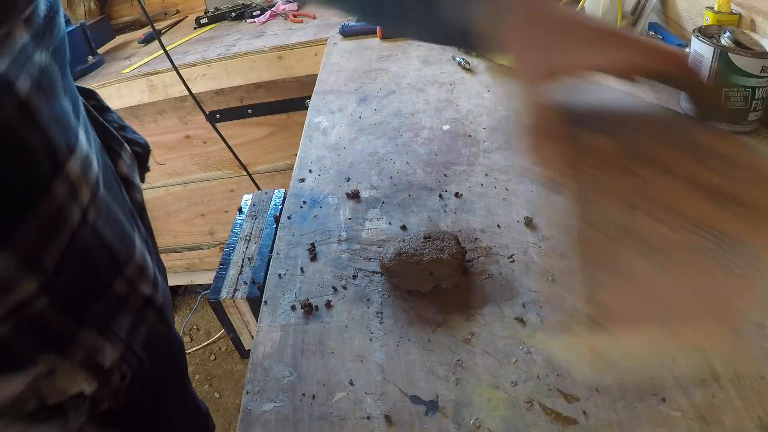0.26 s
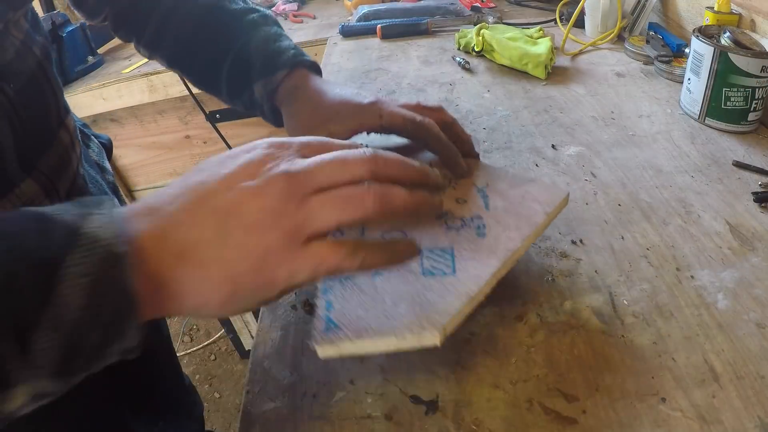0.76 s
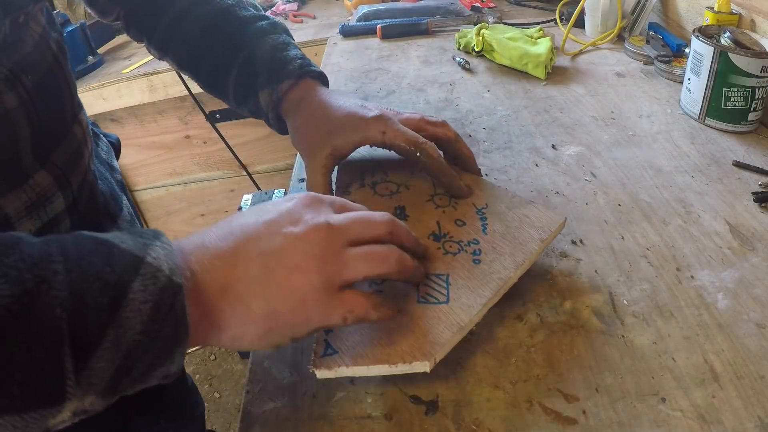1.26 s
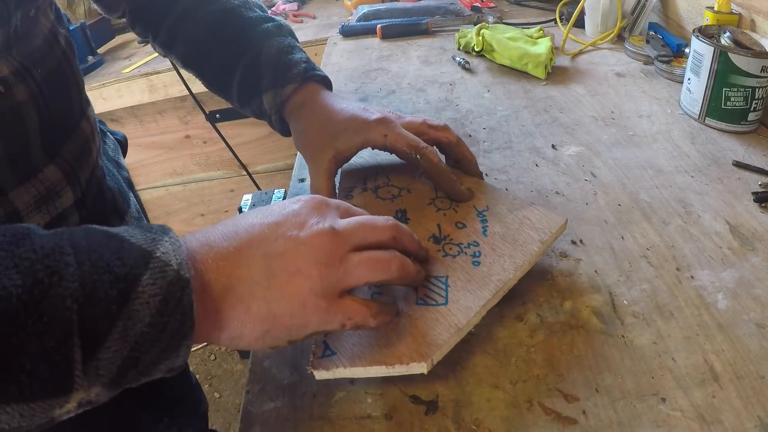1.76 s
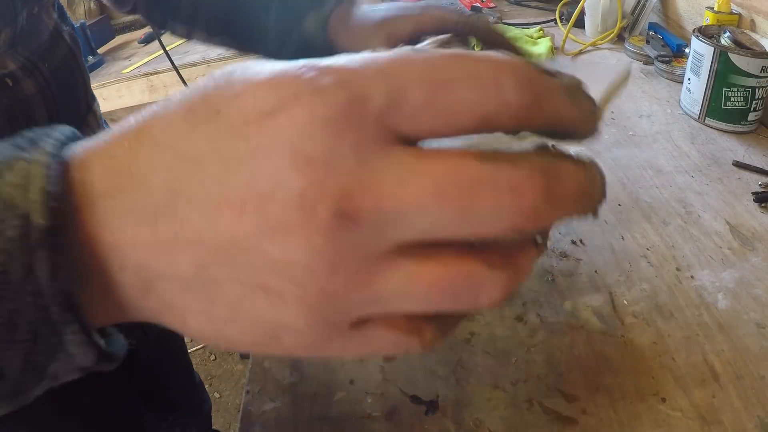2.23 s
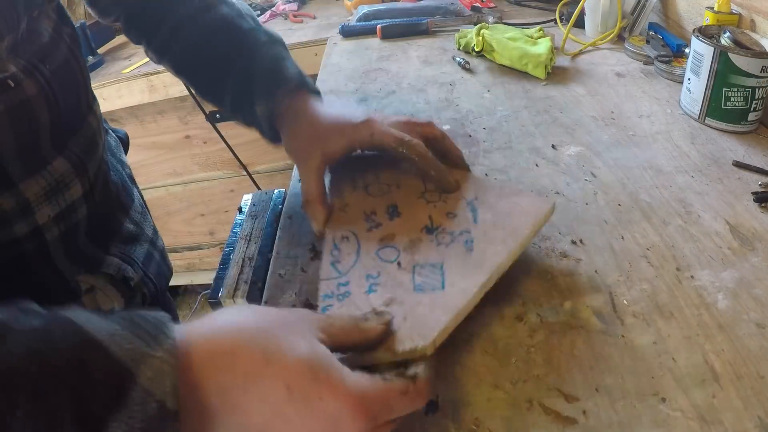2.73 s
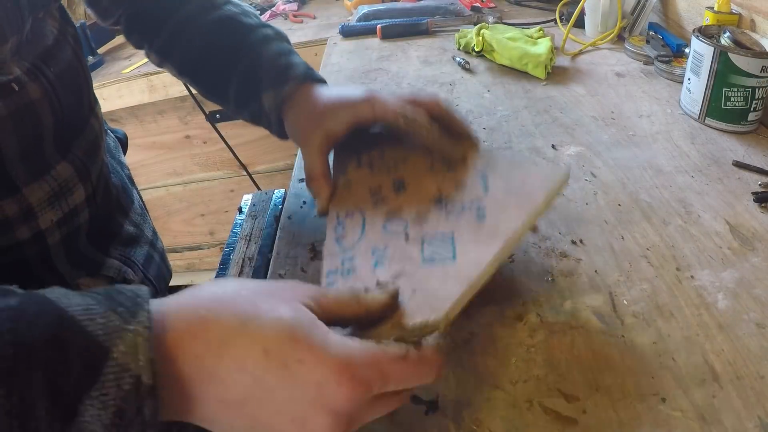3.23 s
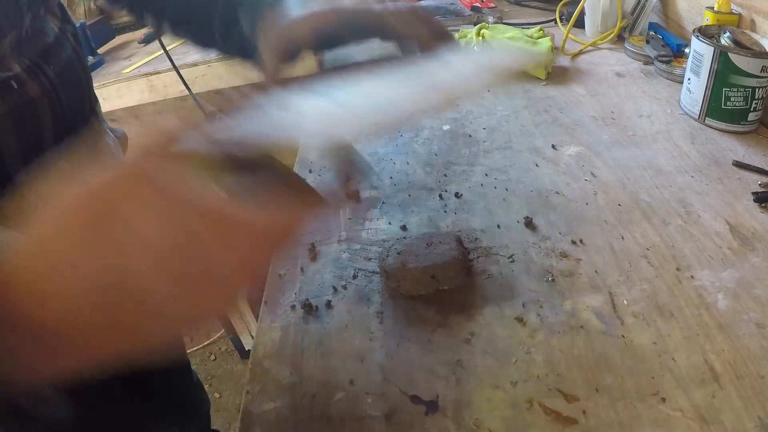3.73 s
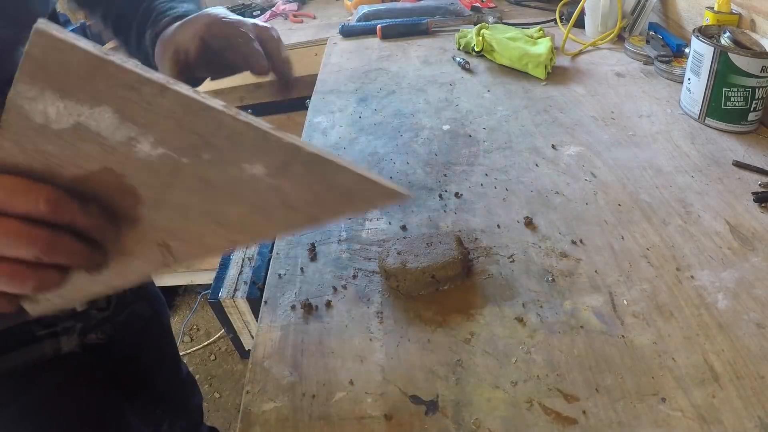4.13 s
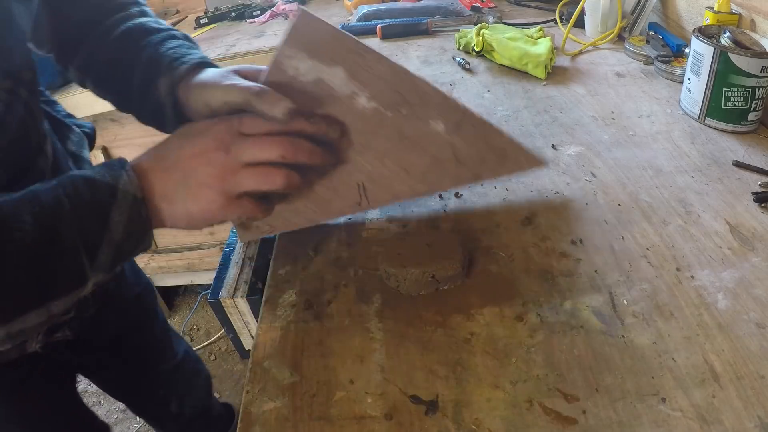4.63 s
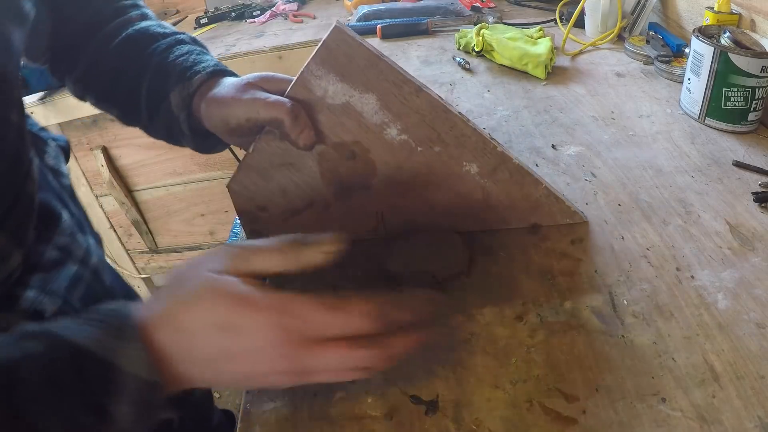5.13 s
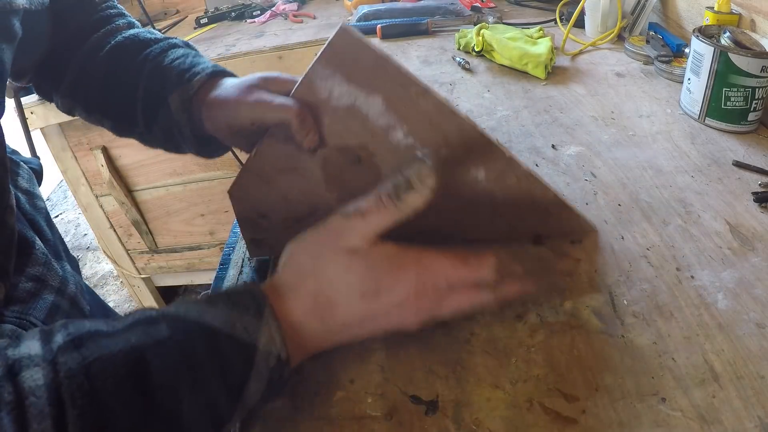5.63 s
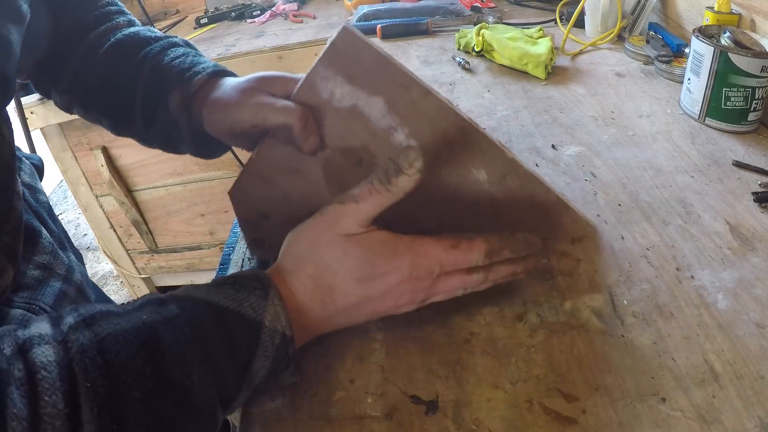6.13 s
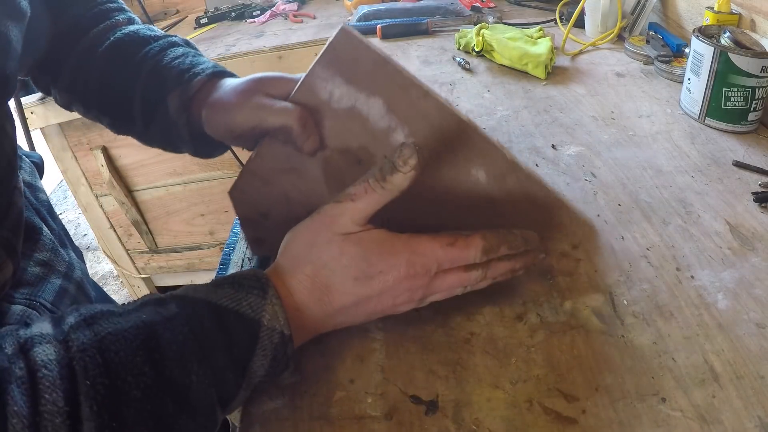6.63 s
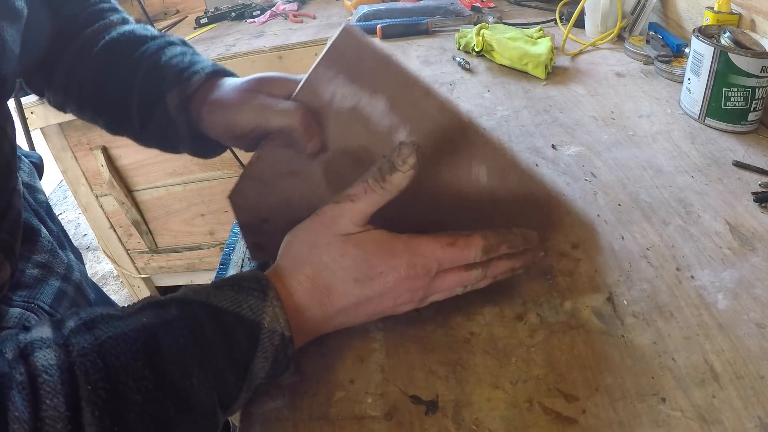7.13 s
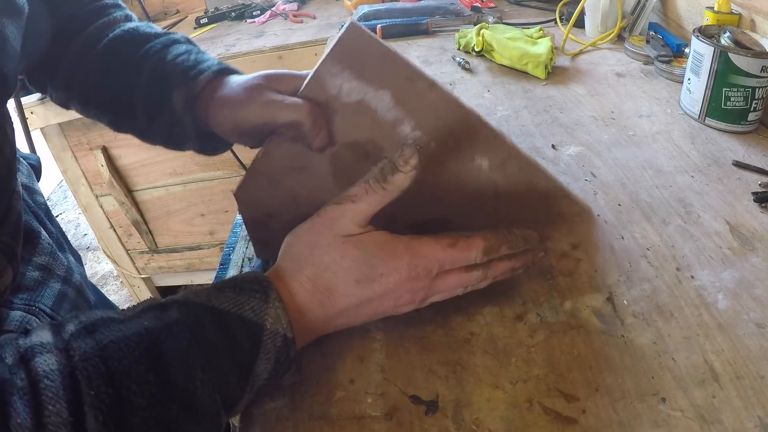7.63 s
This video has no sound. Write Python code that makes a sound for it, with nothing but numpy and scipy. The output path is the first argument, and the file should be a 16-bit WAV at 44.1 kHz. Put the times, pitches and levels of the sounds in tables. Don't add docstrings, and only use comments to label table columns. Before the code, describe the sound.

Close on a workbench in a quiet shed with faint hum and hiss. A palm pats a flat board onto wet soil in two deep thumps, a distant bird chirps, then five heavier slaps boom through the bench. After a lull of light brushing, the lump is slid repeatedly against the upright board with gritty scrapes and wooden knocks. The microphone stands on the bench and shakes.

```python
import sys
import numpy as np
from scipy import signal
from scipy.fft import rfft, irfft, next_fast_len
from scipy.io import wavfile
from scipy.ndimage import uniform_filter1d, minimum_filter1d, map_coordinates

SR = 44100
rng = np.random.default_rng(int(sys.argv[2]) if len(sys.argv) > 2 else 0)


def put_to_file(sound):
    columns = np.atleast_2d(sound).T
    safe = np.clip(columns, -1, 1)
    whole_steps = np.round(safe * 32767)
    wavfile.write(sys.argv[1], SR, whole_steps.astype(np.int16))


def volts_from_db(level):
    exponent = np.asarray(level, float) / 20
    return 10 ** exponent


N = 347508
T = np.arange(N) / SR

# time in seconds, level in dB.
AIR_GAIN = [
    (0, -62),
    (2.76, -62),
    (3.1, -68.5),
    (3.4, -71),
    (3.6, -68.5),
    (4.4, -65.5),
    (5.1, -60),
    (7.88, -60.5),
]
# frequency in Hz, level in dB per Hz.
AIR_COLOUR = [(53, -46), (90, -10.5), (190, -5.5), (274, -6.5), (354, -17.5), (385, -3), (447, -17.5),
              (566, -16.5), (630, -18), (797, -17), (868, -19), (2640, -31.5), (6620, -33.5),
              (12800, -41.5), (14900, -56.5)]
# frequency in Hz, level in dB per Hz.
RUMBLE_COLOUR = [(14, -16), (26, -2), (40, -4), (55, 0), (75, -5), (105, -22), (200, -30), (400, -42),
                 (600, -60)]
# frequency in Hz, likeness from 0 to 1.
FAR_LIKENESS = [(100, 0.21), (260, 0.078), (1000, 0.75), (2000, 0.13), (4000, 0.16), (7000, .05)]
# frequency in Hz, likeness from 0 to 1.
NEAR_LIKENESS = [(100, 0.51), (1000, 0.28), (4000, 0.99), (7000, 0.17), (10000, 0.36)]
LET_GO_DB, BLOW_RUMBLE_DB, RUMBLE_T60_S = -35, -14, 1.9
STILL_DB = -48

# start in seconds, peak in dB,
# hardness as upper mode level in dB, time in seconds until the boom is choked.
TOUCHES = [(0.695, -46, -14, .2), (0.871, -15.5, -13, 0.19), (0.935, -23.5, -4.5, 0.22),
           (1.132, -15.5, -11, .19), (1.24, -33, -19.5, 0.47), (1.435, -38.5, -17, 0.21),
           (1.595, -32.5, -18, 0.19), (1.918, -32.5, -22, 0.25), (2.005, -21.5, -24, 0.16),
           (2.748, -22, -38, .2), (2.763, -12.5, -7, 0.21), (2.971, -12, -11.5, 0.21),
           (3.157, -13, -11.5, 0.16), (3.361, -13.5, -9.5, 0.18), (3.551, -21, -6.5, .1),
           (3.57, -16.5, -5.5, 0.099), (3.66, -38, 3, .2), (4.187, -51.5, -3, .2), (4.619, -38, -37, .2),
           (4.716, -35.5, -33, 0.16), (4.8, -41, -6, .2), (4.913, -36, -6, 0.18), (5.005, -29, -8, 0.16),
           (5.071, -37, -10, 0.19), (5.241, -35, -3.5, .2), (5.295, -18.5, -0.5, .17),
           (5.39, -26.5, -6, 0.097), (5.655, -39, 4, .2), (5.7, -21, -4, .11)]
# start in seconds, peak in dB,
# hardness as upper mode level in dB, time in seconds until the boom is choked.
SHOVES = [(5.799, -19, -3, .1), (5.828, -18, -4, .18), (5.94, -15.5, -5, 0.17), (5.988, -12.5, -16.5, 0.15),
          (6.052, -14, -5, .2), (6.0792, -9, -20, .17), (6.165, -24.5, -21, 0.13), (6.23, -19.5, -13, .13),
          (6.332, -14, -12, .18), (6.446, -15, -14.5, 0.2), (6.494, -15.5, -20, 0.11),
          (6.575, -15.5, -11, .19), (6.715, -15, -14, .17), (6.775, -21, -10, .1), (6.806, -13.5, -8, .17),
          (6.92, -22, -12.5, 0.23), (6.978, -12, -10.5, 0.24), (7.065, -26, -6, 0.14),
          (7.12, -20, -7.5, .13), (7.198, -13.5, -10, .25), (7.2388, -13, -15, 0.13),
          (7.305, -16, -15, 0.21), (7.379, -13.5, -6, .13), (7.425, -17, -12, 0.14),
          (7.485, -20, -30, 0.11), (7.523, -11.5, -10, 0.25), (7.5842, -15, -12, .2),
          (7.65, -11.5, -9, 0.11), (7.725, -14.5, -6, .2), (7.7726, -12, -14, .17)]
# frequency in Hz, level in dB, share of the boom's decay time.
BOOM_MODES = [(143, -9, 1.3), (147.5, 0, 1.0)]
# frequency in Hz, level in dB, decay time (T60) in seconds.
UPPER_MODES = [(203.3, -4, 0.18), (246.7, -1.5, 0.19), (275, -4.5, 0.2), (354.3, -10, 0.16),
               (434, -15, 0.11), (492, -14.5, 0.068), (670, -20, 0.06)]
# frequency in Hz, level in dB, decay time (T60) in seconds.
SWAY_MODES = [(29.1, -12, 0.9), (53.3, 4.5, 0.19), (81.4, -6, 0.59)]
HARD_T60_S, T60_HALVES_DB = 0.95, 39
SWAY_DB, SWAY_GROWS = -25, 0.31

# start in seconds, peak in dB, treble in dB, soil pad in dB, note in Hz.
PATS = [
    (0.877, -3, -26, -49, 1020),
    (1.13, -19, -6, -42, 1040),
    (2.77, 0.5, -20, -12.5, 1360),
    (2.98, -11, -15.5, -4, 1050),
    (3.163, -7, -18.5, -7.5, 1260),
    (3.364, -25, -13, 4, 1070),
    (3.558, -13, -4, -5, 1950),
]
# start in seconds, peak in dB, treble in dB, note in Hz.
TICKS = [
    (0.908, -29, -8.5, 1110),
    (1.592, -35.5, -9, 1530),
    (1.657, -37, -21, 3050),
    (2.108, -28.5, -35, 1000),
    (2.439, -33, -24, 900),
    (4.389, -38, -0.5, 4000),
    (5.247, -30, -9, 1840),
]
# start in seconds, peak in dB, treble in dB, note in Hz.
KNOCKS = [(5.276, -16, -7.5, 1060), (5.804, -12.5, -13, 1760), (5.826, -22.5, -5, 1140),
          (5.999, -26, -18, 3340), (6.334, -15.5, -9, 1150), (6.577, -10, -5, 3630), (6.721, -33, -9, 3460),
          (6.808, -8.5, -13, 1310), (7.198, -8.5, -18, 1306), (7.656, -30, -28, 3280),
          (7.727, -11.5, -8.5, 1790), (7.832, -36.5, -25, 3270)]
# frequency in Hz, width in Hz, level in dB.
BOARD_PEAKS = [(1067, 89, 10), (1640, 390, -1.5), (2280, 260, 0), (3460, 280, -6.5)]
# frequency in Hz, width in Hz, level in dB.
SKIN_PEAKS = [(4260, 540, 4), (6470, 480, 0.5), (9000, 850, -10)]
# frequency in Hz, level in dB per Hz.
SOIL_COLOUR = [(250, -2.5), (420, 3.5), (700, -4), (1000, -9), (1600, -18.5)]
# frequency in Hz, decay time (T60) in seconds.
SHED_DECAY = [(300, 0.1), (1000, 0.27), (4000, 0.11), (10000, 0.23)]
PAT_TAIL_DB, PAT_TAIL_GROWS = -21.5, 0.24
TICK_PAD_DB, TICK_TAIL_DB = -20.5, -14.5
KNOCK_PAD_DB, KNOCK_TAIL_DB = -11.5, -22.5
OVERTONE, OVERTONE_DB = 1.7, -8.5
SOFT_HZ = 6000

# start in seconds, frequency in Hz,
# level in dB, decay time (T60) in seconds.
FREE_RINGS = [(.878, 1040, -17, .09), (2.981, 1020, -17, .09), (6.992, 350, -15, .15),
              (7.535, 345, -15, .13), (7.655, 357, -14, .12), (5.715, 350, -21, .13), (1.18, 70, -22, .5),
              (2.99, 62, -20, .5), (.935, 277, -17, 0.18), (.94, 364, -24, .2), (1.145, 274, -22, 0.28),
              (1.15, 360, -22, .25), (2.772, 670, -17, .1), (2.984, 670, -16, .12), (2.775, 357, -14, .12),
              (2.985, 360, -14, .12), (3.172, 503, -20, .1), (3.572, 490, -6, .12), (3.57, 360, -13, .1),
              (5.345, 349, -14, .25), (5.35, 262, -19, .25), (5.3, 48, -17, .3), (5.82, 52, -15, .35),
              (4.62, 62, -27, .4), (3.6, 75, -26, 1.1)]
# start in seconds, peak in dB, note in Hz.
THUDS = [(0.881, -20, 207), (1.134, -25, 215), (2.776, -17, 205), (2.984, -13.5, 207), (3.175, -17.5, 240),
         (3.378, -16, 242), (3.57, -16, 218), (5.297, -16.5, 237), (5.712, -23, 242), (5.804, -13.5, 242),
         (5.824, -12, 252.4), (5.949, -22, 242), (5.997, -14, 207), (6.053, -13.5, 242), (6.073, -15, 260),
         (6.335, -18.5, 244), (6.447, -23, 242), (6.494, -28, 205), (6.577, -15, 235), (6.721, -19, 206),
         (6.808, -13.5, 242), (6.854, -28, 213), (6.983, -13, 207), (7.016, -23, 207), (7.068, -25, 263),
         (7.133, -26, 207), (7.198, -16.5, 241), (7.24, -21, 248), (7.307, -25, 256), (7.382, -19.5, 231),
         (7.425, -19, 210), (7.528, -18, 207), (7.584, -16, 205), (7.653, -15.5, 258), (7.728, -15, 245),
         (7.774, -14, 226)]
# multiple of the note, level in dB, decay time (T60) in seconds.
THUD_PARTIALS = [(1, 1.5, .065), (1.5, -6, 0.082), (1.8, -7, 0.055), (2.3, -9, .045), (3.0, -11, .04)]
THUD_DB, THUD_RISE_S = 14.5, .0025

# start in seconds, level in dB, decay time (T60) in seconds.
NODS = [
    (0.899, -15, 3),
    (1.16, -19, 0.6),
    (2.0, -39.5, 0.77),
    (2.801, -20.5, 2.8),
    (3.0, -16.5, 0.86),
    (4.34, -27, 0.32),
]

# peak time in seconds, level in dB, rise and fall in ms over 10 dB.
BRUSHES = [(.915, -44, 8, 14), (1.134, -39.5, 1.5, 8), (3.88, -65.5, 200, 117), (1.504, -56, 83, 4),
           (1.662, -52, 38, 52), (2.053, -47.5, 19, 41), (2.116, -52.5, 85, 7), (2.441, -60, 12, 7),
           (2.519, -49.5, 8, 13), (4.059, -52, 28, 30), (4.222, -54.5, 12, 81), (4.392, -57, 32, 27),
           (4.63, -61, 209, 200), (4.822, -57, 50, 63), (4.925, -50, 29, 200), (5.007, -45.5, 103, 49),
           (5.365, -48, 47, 33), (5.507, -54, 123, 10), (5.7, -49.5, 65, 51), (3.554, -45.5, 8.5, 63),
           (7.066, -46, 6, 69), (7.609, -47.5, 35, 76), (7.793, -44, 25, 58)]
# peak time in seconds, level in dB, rise in ms over 10 dB.
PUSHES = [(5.293, -39.5, 31), (5.714, -37.5, 9), (5.805, -33, 26), (6.064, -29, 23), (6.325, -34.5, 27),
          (6.576, -31.5, 24.5), (6.8, -30, 22), (7.003, -33.5, 21), (7.191, -32, 26), (7.373, -33, 28),
          (7.535, -36.5, 9.5), (7.723, -32.5, 40)]
# peak time in seconds, level in dB, rise in ms over 10 dB.
PULLS = [(5.952, -43, 22), (5.975, -42.5, 12), (5.999, -38.5, 3), (6.203, -44, 23), (6.243, -41, 27),
         (6.451, -41, 22), (6.502, -46.5, 45), (6.689, -39.5, 25), (6.72, -42, 9), (6.909, -42, 42),
         (6.929, -40.5, 27), (7.127, -37.5, 57), (7.309, -39, 45), (7.489, -41.5, 49), (7.657, -39, 6),
         (7.834, -43, 15.5), (7.869, -38, 6)]
# frequency in Hz, level in dB per Hz.
GRIT_COLOUR = [(880, -12), (1500, -16), (1750, -10.5), (2800, -6.5), (3330, -3.5), (3770, -5), (6780, -4.5),
               (8300, -19), (12800, -30.5), (13700, -52), (14900, -105)]
# frequency in Hz, width in Hz, level in dB.
GRIT_RINGS = [(3340, 230, -4.5), (6170, 800, -7.5)]
# frequency in Hz, level in dB per Hz.
DRAG_COLOUR = [(250, -43), (400, 3.5), (800, -2.5), (1400, -5.5), (2200, -8.5)]
# frequency in Hz, level in dB per Hz.
SHAKE_COLOUR = [(90, -16), (145, -1.5), (200, -2.5), (260, -9.5), (380, -13.5), (550, -35)]
PUSH_FALL_MS, PULL_FALL_MS = 20.6, 19
PUSH_STARTS, PUSH_EDGE_DB = 1.28, 50
CRUMBLE_S, CRUMBLE_DB, CRUMBLE_RISE_MS, CRUMBLE_FALL_MS = 0.037, -20, 24, 40
BRUSH_LOW_DB, PUSH_LOW_DB, PULL_LOW_DB, CRUMBLE_LOW_DB = -3, -6.5, -7.5, -2.5

# start and end in seconds, start and end pitch in Hz, level in dB.
BIRD = [
    (.95, 1.01, 3350, 3280, -63),
    (1.05, 1.09, 2350, 2200, -59),
    (1.17, 1.24, 4150, 4500, -59),
    (1.225, 1.3, 6120, 6070, -56),
    (1.326, 1.365, 5600, 2800, -52),
    (1.355, 1.42, 2800, 2580, -58),
    (1.45, 1.55, 2450, 2350, -60),
    (1.53, 1.57, 2900, 2950, -63),
]
# frequency in Hz, width in Hz, level in dB.
SLIDE_PEAKS = [(1040, 39, 10.5), (1840, 78, -9), (3050, 80, -4), (4600, 160, -14)]
SLIDE_S, SLIDE_END_S, SLIDE_DB = 2.04, 2.125, -37.5
# start in seconds, level in dB, time until damped in seconds.
TOOL = [
    (2.775, -66, 0.22),
    (2.985, -47.5, 0.18),
]
# start in seconds, peak in dB.
SNAPS = [(5.2744, -18), (5.2964, -25), (5.8032, -16.5), (5.8254, -27), (5.8554, -35), (5.8634, -31),
         (5.9269, -32), (5.9968, -21), (6.0437, -20), (6.3066, -24), (6.333, -19), (6.4434, -29),
         (6.549, -22), (6.5765, -13), (6.6747, -30), (6.7216, -29), (6.782, -20), (6.8069, -12),
         (6.9002, -28), (6.983, -23), (7.1611, -22), (7.1975, -11.5), (7.3053, -27), (7.3462, -28),
         (7.5303, -25), (7.653, -24), (7.7268, -12.5), (7.8311, -29), (7.8605, -30)]
# frequency in Hz, width in Hz, level in dB.
SNAP_PEAKS = [(900, 1100, 8), (3500, 1530, -1), (5800, 1200, -10)]
SNAP_DB, SNAP_T60_S = 7, .011
SNAP_GROWS = 1.55

# frequency in Hz, phase in radians.
PORT_PHASE = [(20, 0), (35, -.4), (60, -1.2), (145, -2.0), (260, -2.45), (600, -3.2), (1300, -4.0),
              (2000, -5.6), (2800, -6.0), (4000, -6.2), (7000, -5.8), (15000, -6.2)]
# frequency in Hz, left minus right in dB.
PORT_BALANCE = [(30, -1), (55, -3), (145, -3.5), (300, -2.5), (700, 1), (1500, 0), (5000, -1), (14000, -.5)]
# frequency in Hz, level in dB.
MONO_COLOUR = [(60, 2), (200, -1), (500, -3), (1200, -1.5), (3000, 1.5)]
# time in seconds, share from 0 to 1.
WIDTH = [
    (0, 1),
    (3.62, 1),
    (4.05, 0),
    (4.82, 0),
    (5.3, 1),
    (7.88, 1),
]
TOP_HZ = 15050


def unit(x):
    return x / np.sqrt(np.mean(x ** 2) + 1e-20)


def along(points, hz):
    f, v = np.transpose(points)
    return np.interp(np.log(hz + 1), np.log(f + 1), v)


def wobble(rate):
    return map_coordinates(rng.standard_normal(int(N * rate / SR) + 4), [T * rate])


def place(out, start_s, sound):
    i = round(start_s * SR)
    out[..., i:i + sound.shape[-1]] += sound


def filtered(x, response):
    m = next_fast_len(N + SR // 2)
    return irfft(rfft(x, m) * response(np.fft.rfftfreq(m, 1 / SR)), m)[..., :N]


def resonant(x, peaks):
    def response(f):
        return sum((-1) ** k * volts_from_db(db) * 1j * f * width / (hz * hz - f * f + 1j * f * width)
                   for k, (hz, width, db) in enumerate(peaks))
    return filtered(x, response)


def softened(x):
    return filtered(x, lambda hz: 1 / (1 + 1j * hz / SOFT_HZ) ** 2)


def rush(spectrum, alike, grain=1):
    def mid_side(hz):
        turn = np.arccos(np.clip(along(alike, hz), 0, 1)) / 2
        colour = volts_from_db(along([(5, -120)] + list(spectrum) + [(17000, -120)], hz))
        return colour * [np.cos(turn), np.sin(turn)]
    mid, side = filtered(grain * rng.standard_normal((2, N)), mid_side)
    return unit(np.array([mid + side, mid - side]))


def patchy(x, depth_db):
    z = signal.stft(x, nperseg=512)[2]
    field = uniform_filter1d(rng.standard_normal(z.shape[1:]), size=4, axis=0)
    field = uniform_filter1d(field, size=7, axis=1)
    return unit(signal.istft(z * volts_from_db(depth_db * unit(field)), nperseg=512)[1][:, :N])


def ring(t, hz, db, t60, turns=0):
    return volts_from_db(db - 60 * t / t60) * np.sin(2 * np.pi * (hz * t + turns))


def shaken_db():
    power = volts_from_db(2 * STILL_DB) + volts_from_db(2 * (LET_GO_DB - 60 * T / RUMBLE_T60_S))
    for s, db, *_ in TOUCHES + SHOVES:
        i = round(s * SR)
        t = T[:N - i]
        power[i:] += volts_from_db(2 * (db + BLOW_RUMBLE_DB - 60 * t / RUMBLE_T60_S)) * np.minimum(t / .06, 1)
    return 10 * np.log10(power)


def background():
    hiss_db = np.interp(T, *np.transpose(AIR_GAIN)) + 17.5 + 0.29 * wobble(3.36)
    hiss = volts_from_db(hiss_db) * patchy(rush(AIR_COLOUR, FAR_LIKENESS), depth_db=1.5)
    rumble = volts_from_db(shaken_db() + 2.5 * wobble(9)) * rush(RUMBLE_COLOUR, [(30, .85), (60, .5), (300, .8)])
    hum = volts_from_db(-43.5 + 0.56 * wobble(6.6)) * np.sin(2 * np.pi * 55 * T + 0.24 * wobble(3.6))
    whine = volts_from_db(-64 + 0.67 * wobble(14)) * np.sin(2 * np.pi * 387 * T + .5 * wobble(6.67))
    still = np.clip((2.77 - T) / .02, 0, 1)
    return hiss + rumble + still * (hum + whine)


def blows():
    rows = []
    for s, db, hard_db, held_s in TOUCHES + SHOVES:
        sway_db = SWAY_DB + (SWAY_GROWS - 1) * db
        t60 = HARD_T60_S * 2 ** (min(hard_db, 0) / T60_HALVES_DB)
        rows.append((s, db, hard_db, sway_db, t60, held_s))
    return rows


def bench():
    out, t = np.zeros((2, N + 2 * SR)), np.arange(SR) / SR
    swell = (1 - np.exp(-t / 0.0038)) ** 2
    bloom = (1 - np.exp(-t / 0.012)) ** 2
    quick = 1 - np.exp(-np.maximum(t - .005, 0) / 0.002)

    def turns(spread):
        return rng.random() + spread * rng.standard_normal((2, 1))

    rows = blows()
    next_starts = [row[0] for row in rows[1:]] + [9]
    for (s, db, upper_db, sway_db, t60, held_s), later in zip(rows, next_starts):
        damped = volts_from_db(-60 * np.maximum(t - (later - s), 0) / 0.035)
        pressed = np.maximum(volts_from_db(-60 * (t / held_s) ** 2.48), volts_from_db(-17.5))
        boom = sum(ring(t, hz, level, max(t60, .04) * share, [[0.067 * rng.normal()], [0]])
                   for hz, level, share in BOOM_MODES)
        upper = sum(ring(t, hz * rng.normal(1, 0.033), level + upper_db + rng.normal(0, 1.52), decay, turns(0.098))
                    for hz, level, decay in UPPER_MODES)
        sway = sum(ring(t, hz * rng.normal(1, 0.026), level + sway_db + 0.5, decay, turns(0.27))
                   for hz, level, decay in SWAY_MODES)
        blow = bloom * damped * pressed * boom + quick * damped * upper + swell * sway
        place(out, s, volts_from_db(db + 8.2) * blow)
    return out[:, :N]


def cracks():
    pats = [(s, db, treble_db, pad_db, PAT_TAIL_DB + (PAT_TAIL_GROWS - 1) * db, hz)
            for s, db, treble_db, pad_db, hz in PATS]
    ticks = [(s, db, treble_db, TICK_PAD_DB, TICK_TAIL_DB, hz) for s, db, treble_db, hz in TICKS]
    knocks = [(s, db, treble_db, KNOCK_PAD_DB, KNOCK_TAIL_DB, hz) for s, db, treble_db, hz in KNOCKS]
    return pats + ticks + knocks


def slaps():
    low, high, pads, notes = np.zeros((4, N + SR))
    tails, t = np.zeros((2, N + SR)), np.arange(SR // 2) / SR
    for s, db, treble_db, pad_db, tail_db, note_hz in cracks():
        crack = rng.standard_normal(len(t)) * volts_from_db(-60 * (t / .008) ** 1.5)
        crack[0] = .6 * np.linalg.norm(crack)
        crack *= 8 / np.linalg.norm(crack)
        place(low, s, volts_from_db(db + 5.5) * crack)
        place(high, s, volts_from_db(db + treble_db + 8.5) * crack)
        place(notes, s, ring(t, note_hz, db - 4, .016))
        if note_hz < 2500:
            place(notes, s, ring(t, OVERTONE * note_hz, db + OVERTONE_DB, 0.01))
        place(pads, s, volts_from_db(db + pad_db - 60 * t / 0.15) * (1 - np.exp(-t / 0.00024)))
        hz, at, z = signal.stft(rng.standard_normal((2, len(t))), SR, nperseg=128)
        fading = z * volts_from_db(-60 * at / along(SHED_DECAY, hz)[:, None])
        tail = signal.istft(fading, SR, nperseg=128)[1][:, :len(t)]
        tail = tail + 0.24 * tail[::-1]
        place(tails, s, volts_from_db(db + tail_db) * tail * (1 - np.exp(-t / 0.00093)))
    crisp = softened(resonant(low[:N], BOARD_PEAKS) + resonant(high[:N], SKIN_PEAKS) + notes[:N])
    pad = pads[:N] * rush(SOIL_COLOUR, [(400, 0.36), (1000, 0.65)])
    dull = [(200, -75), (500, 2), (2000, 3.0), (6000, -7), (8000, -17.0), (15000, -55)]  # Hz, dB
    return crisp + pad + filtered(tails[:, :N], lambda hz: volts_from_db(along(dull, hz)))


def free_rings():
    out, t = np.zeros(N + SR), np.arange(SR // 4) / SR
    for s, hz, db, t60 in FREE_RINGS:
        place(out, s, (1 - np.exp(-t / 0.0067)) * ring(t, hz, db, t60))
    return out[:N]


def thuds():
    out, t = np.zeros(N + SR), np.arange(SR // 4) / SR
    for s, db, hz in THUDS:
        thud = sum(ring(t, hz * multiple, db + THUD_DB + level, t60) for multiple, level, t60 in THUD_PARTIALS)
        place(out, s, (1 - np.exp(-t / THUD_RISE_S)) ** 2 * thud)
    return out[:N]


def stand():
    out, t = np.zeros(N + 2 * SR), np.arange(2 * SR) / SR
    for s, db, t60 in NODS:
        place(out, s, (1 - np.exp(-t / 0.034)) * ring(t, 26.27, db, t60))
    return out[:N]


def strokes():
    brushes = [(*row, BRUSH_LOW_DB, 0) for row in BRUSHES]
    pushes = [(*row, PUSH_FALL_MS, PUSH_LOW_DB, PUSH_EDGE_DB) for row in PUSHES]
    crumbs = [(s + CRUMBLE_S, db + CRUMBLE_DB, CRUMBLE_RISE_MS, CRUMBLE_FALL_MS, CRUMBLE_LOW_DB, 0)
              for s, db, _ in PUSHES]
    pulls = [(*row, PULL_FALL_MS, PULL_LOW_DB, 0) for row in PULLS]
    return brushes + pushes + crumbs + pulls


def scraping():
    fine, coarse = np.zeros((2, N))
    for s, db, rise_ms, fall_ms, low_db, edge_db in strokes():
        away = 1000 * np.where(T < s, (s - T) / rise_ms, (T - s) / fall_ms)
        power = volts_from_db(2 * (db - 10 * np.minimum(away, 9) ** 1.9))
        power *= volts_from_db(-2 * edge_db * (T < s) * np.clip(away - PUSH_STARTS, 0, 1))
        fine += power
        coarse += power * volts_from_db(2 * low_db)
    grain = volts_from_db(2.2 * wobble(1200) + 1.0 * wobble(200))
    sand = patchy(rush(GRIT_COLOUR, NEAR_LIKENESS, grain), depth_db=1.5)
    singing = resonant(sand, GRIT_RINGS[:1]) + resonant(sand, GRIT_RINGS[1:])
    grit = volts_from_db(1.0) * np.sqrt(fine) * unit(sand + singing)
    drag = volts_from_db(7.0) * np.sqrt(coarse) * patchy(rush(DRAG_COLOUR, NEAR_LIKENESS, grain), depth_db=-1.5)
    on_bench = T > 3.62
    shake = volts_from_db(-12.0) * fine ** 0.26 * on_bench * rush(SHAKE_COLOUR, NEAR_LIKENESS)
    return grit + drag + shake


def bird():
    out = np.zeros(N + SR)
    for s, end, start_hz, end_hz, db in BIRD:
        u = np.linspace(0, 1, round((end - s) * SR))
        hz = end_hz + (start_hz - end_hz) * (1 - u) ** 2.3 + 80 * wobble(307)[:len(u)]
        swell = np.sin(np.pi * u ** 0.42)
        place(out, s, volts_from_db(db - 2.5) * swell * np.sin(2 * np.pi * np.cumsum(hz) / SR))
    t = np.arange(SR // 8) / SR
    echo = rng.standard_normal(len(t)) * volts_from_db(-60 * t / 0.16)
    out += 2.0 * signal.fftconvolve(out, echo / np.linalg.norm(echo))[:N + SR]
    return out[:N]


def sliding():
    on = np.clip(np.minimum(T - SLIDE_S, SLIDE_END_S - T) / 0.01, 0, 1)
    catches = volts_from_db(2.4 * wobble(120)) * rng.standard_normal(N)
    return volts_from_db(SLIDE_DB) * on * unit(resonant(catches, SLIDE_PEAKS))


def loose_tool():
    out = np.zeros(N + SR)
    for s, db, length in TOOL:
        t = np.arange(round(length * SR)) / SR
        place(out, s, ring(t, 5810, db, 0.64) * np.minimum(1, (length - t) / 0.0083))
    return out[:N]


def snaps():
    edges, t = np.zeros(N + SR), np.arange(SR // 4) / SR
    for s, db in SNAPS:
        edge = np.sign(rng.standard_normal(len(t))) * volts_from_db(-60 * (t / SNAP_T60_S) ** 1.5)
        place(edges, s, volts_from_db(SNAP_GROWS * db + SNAP_DB) * edge)
    return softened(resonant(edges[:N], SNAP_PEAKS))


def scene():
    struck = bench() + slaps() + free_rings() + thuds() + stand()
    rubbed = scraping() + sliding() + snaps()
    return background() + struck + rubbed + bird() + loose_tool()


def low_pass(x):
    return signal.sosfilt(signal.butter(12, 15060, fs=SR, output="sos"), x)


def record(dry):
    left = filtered(dry[0], lambda hz: volts_from_db(along(PORT_BALANCE, hz)) * np.exp(1j * along(PORT_PHASE, hz)))
    right = dry[1]
    mono = filtered(right, lambda hz: volts_from_db(along(MONO_COLOUR, hz)))
    width = np.interp(T, *np.transpose(WIDTH))
    x = width * np.array([left, right]) + (1 - width) * mono
    need = np.minimum(1, .93 / (np.abs(x).max(axis=0) + 1e-9))
    limiter = uniform_filter1d(minimum_filter1d(need, size=601), size=301)
    mix = filtered(x * limiter, lambda hz: hz < TOP_HZ)
    return low_pass(mix)


dry = scene()
out = record(dry)
put_to_file(out)
```